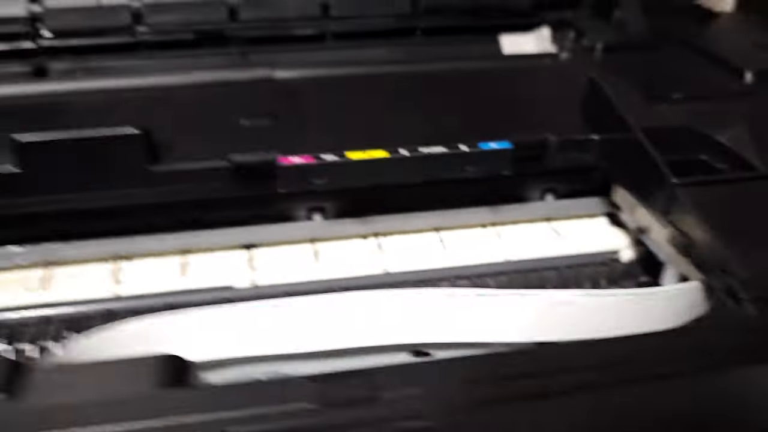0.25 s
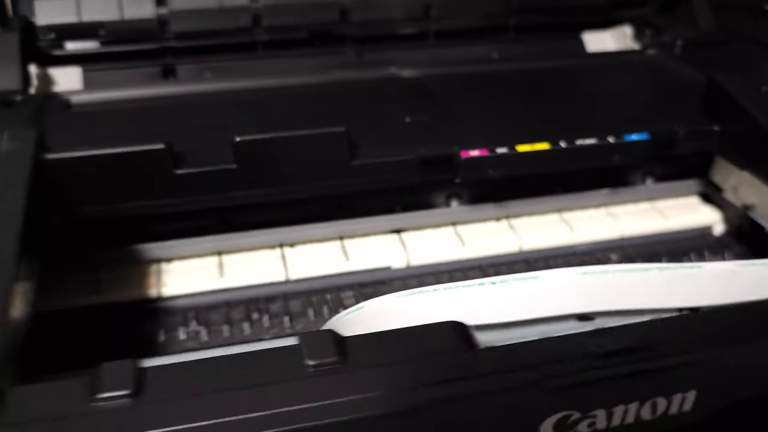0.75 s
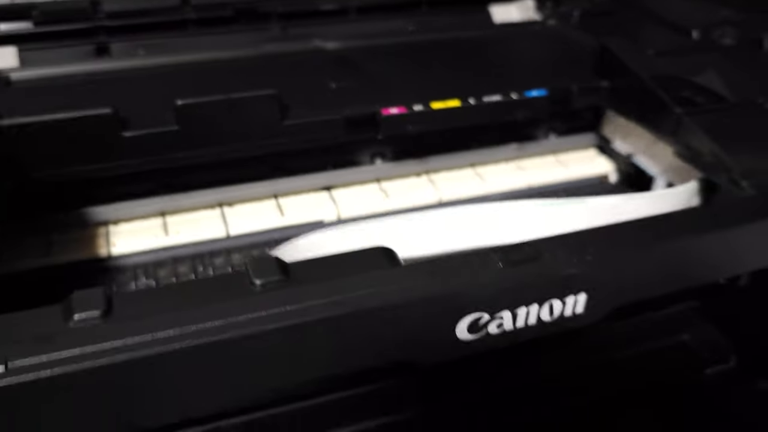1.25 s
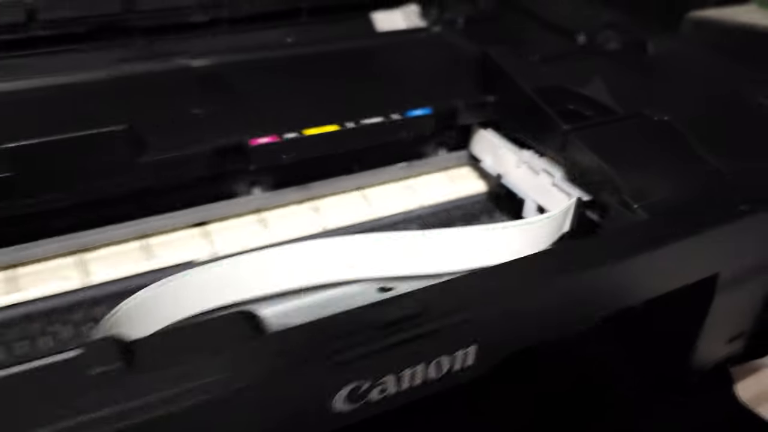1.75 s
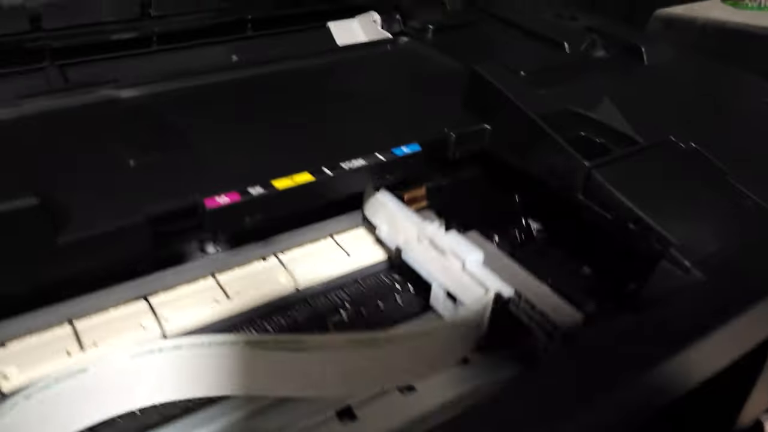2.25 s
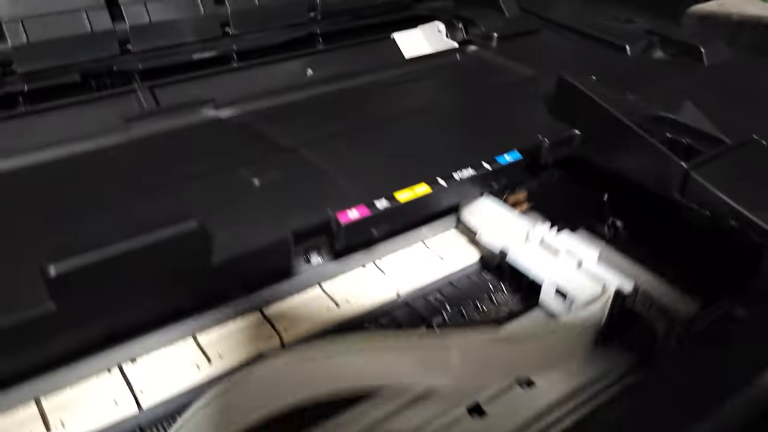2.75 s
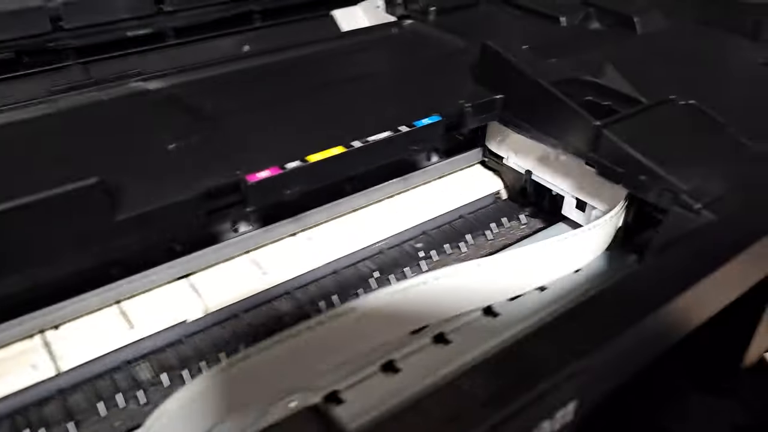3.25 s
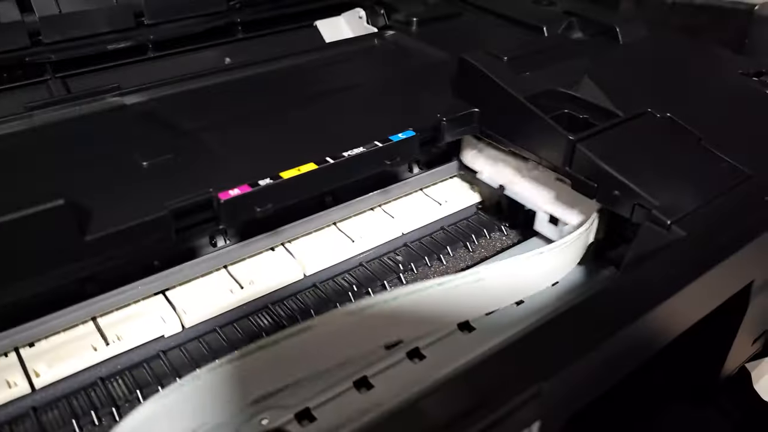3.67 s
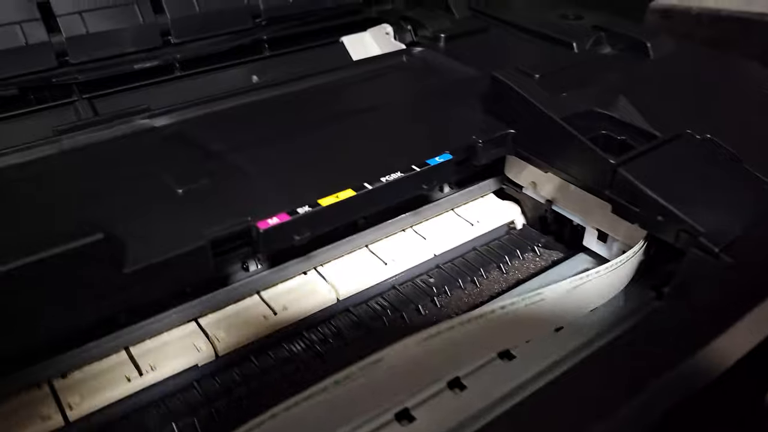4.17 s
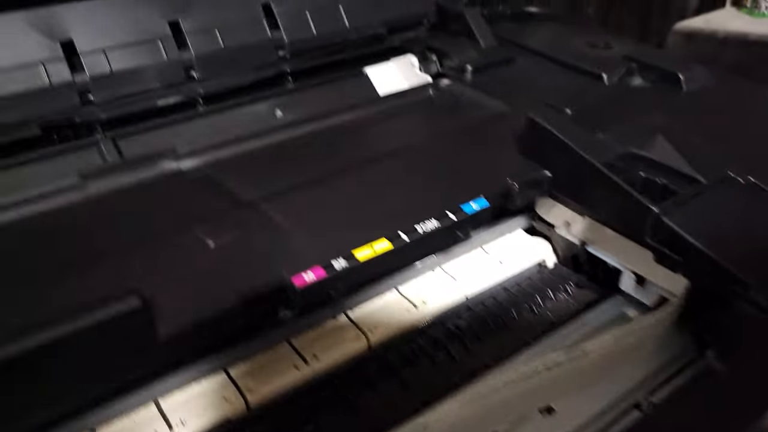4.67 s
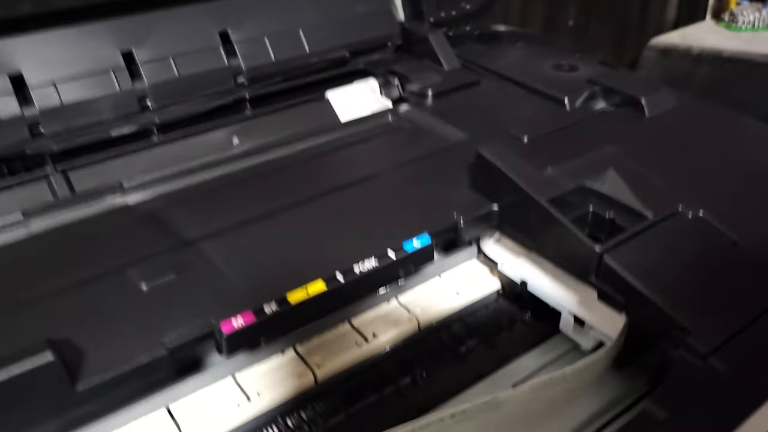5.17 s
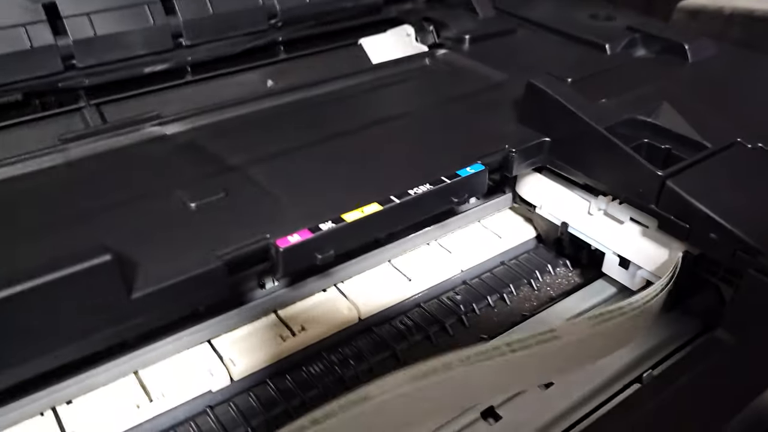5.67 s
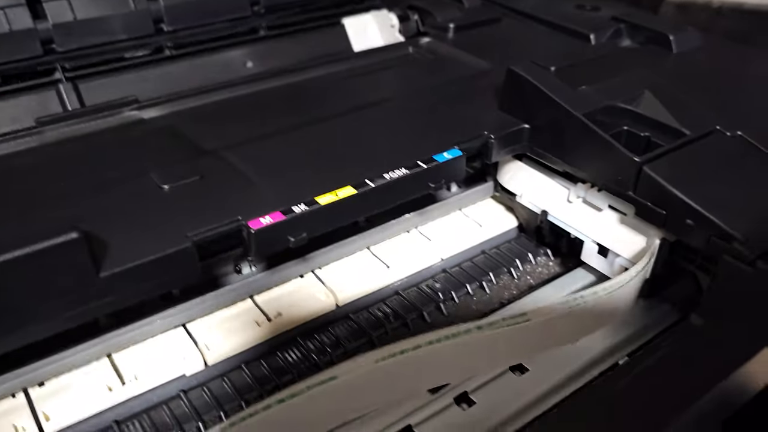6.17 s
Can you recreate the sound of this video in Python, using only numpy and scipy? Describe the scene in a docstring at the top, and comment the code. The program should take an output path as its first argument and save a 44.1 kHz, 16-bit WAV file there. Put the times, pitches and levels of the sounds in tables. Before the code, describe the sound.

An open inkjet printer hums and hisses as its carriage shuffles, with irregular plastic clicks and thumps, ending in a sharp knock.

```python
"""Inkjet printer shuffling its carriage.

Open printer, close by, small room. The motor hums through the plastic case; sliding parts hiss,
scrape and squeak; gears whine. Drive jolts thump the case and rattle loose parts, levers click.
At the end the carriage strikes its stop with a sharp knock that rings the frame."""
import sys
import numpy as np
from scipy import signal
from scipy.fft import rfft, irfft, next_fast_len
from scipy.io import wavfile
from scipy.ndimage import uniform_filter1d, map_coordinates

SR = 44100
rng = np.random.default_rng(int(sys.argv[2]) if len(sys.argv) > 2 else 0)


def store_pcm(level_fs):
    """Save levels as 16-bit WAV."""
    pcm = np.round(np.clip(level_fs, -1, 1) * 32767).astype(np.int16)
    wavfile.write(sys.argv[1], SR, np.atleast_2d(pcm).T)


N = 282284
HIT_N = SR // 2
TIME_S, HIT_S = np.arange(N) / SR, np.arange(HIT_N) / SR
SPIN_RAMP_S = 0.091

# motor runs: start/s, end/s, hum/dB, rub/dB
MOTOR_RUNS = [(-0.1, 0.533, -55, -62), (0.65, 1.46, -57.5, -69.5), (1.653, 3.415, -57.5, -71.5),
              (3.547, 4.224, -56, -100), (4.317, 5.117, -54, -76), (5.262, 6.5, -52, -59)]
# motor drone: f/Hz, density/dB
DRONE_SPECTRUM = [(20, -22), (50, -27), (72, -16.5), (105, 0), (180, -5), (300, -3), (390, -18), (550, -10),
                  (750, -63)]
# case resonances driven by the motor: f/Hz, width/Hz, level/dB
HUM_RESONANCES = [(56.5, 6.1, -5), (130, 8.2, 0), (196, 28, -4.5)]
# carriage passes: start/s, end/s, ramp/s, hiss/dB
CARRIAGE_PASSES = [(-0.1, 0.168, 0.025, -58), (0.223, 0.47, 0.057, -52), (1.843, 3.324, 0.28, -61.5),
                   (5.274, 5.46, 0.0044, -64)]
# rail resonances: f/Hz, width/Hz, level/dB
RAIL_RESONANCES = [(3380, 140, 13.5), (7400, 420, 12), (13100, 2600, 0.89)]
# parts catching: start/s, end/s, groan/dB, rasp/dB
CATCHES = [(0.45, 0.496, -47.5, -49), (0.674, 0.712, -49, -50.5), (3.329, 3.392, -43.5, -66),
           (3.551, 3.68, -54, -60), (4.019, 4.14, -54, -80), (4.321, 4.364, -49.5, -63)]
# sliding hiss, plastic rub: f/Hz, density/dB
SLIDE_SPECTRUM = [(700, -1.5), (1900, 0.5), (2500, -3), (3500, 0.5), (4500, 2), (6000, -3.5), (8600, -5.5),
                  (10300, -14.5), (12500, -7.5), (16000, -28)]
RUB_SPECTRUM = [(250, -13), (450, 11), (560, 9.5), (720, 9.5), (900, 4), (1400, 0.5), (2000, -1),
                (2600, -10), (4500, -12.5), (9000, -32)]
# drive jolts, lever clicks: t/s, strength/dB, hardness/0-1
DRIVE_JOLTS = [(0.138, -33, 0.52), (0.224, -29, 0.85), (0.858, -37.5, 0.47), (1.287, -33.5, 0.52),
               (1.781, -38, 0.74), (1.855, -38.5, 0.4), (2.537, -38, 0.48), (2.58, -46.5, 0.4),
               (3.254, -28.5, 0.28), (3.345, -27.5, 0.78), (3.551, -31.5, 0.57), (3.708, -30.5, 0.38),
               (3.804, -27, 0.78), (4.422, -39.5, 0.44), (4.877, -29, 0.53), (5.377, -41, 0.67),
               (6.149, -29, 0.77)]
LEVER_CLICKS = [(0.432, -38.5, 0.7), (0.566, -52, 0), (0.7151, -36.5, 0.88), (1.198, -46.5, 0.3),
                (1.272, -44.5, 0.63), (1.3643, -42.5, 0.99), (1.438, -52.5, 0.8), (1.49, -36.5, 0.78),
                (1.6379, -44, 0.26), (1.69, -30, 0.24), (1.9473, -42, 0.5), (3.254, -36.5, 0.2),
                (3.5939, -38, 0.82), (3.641, -28.5, 0.2), (3.708, -37, 0.32), (4.105, -25.5, 0.67),
                (4.33, -36.5, 0.16), (4.348, -37.5, 0.16), (4.37, -36.5, 1), (4.8595, -43.5, 0.74),
                (4.918, -32, 0.47), (5.023, -48.5, 0.28), (5.1162, -42, 0.49), (5.2301, -22, 0.12),
                (5.289, -33, 0.19), (5.51, -35.5, 0.31), (5.842, -39, 0.1), (6.2205, -36, 0.5)]
# blows on the stop, heavy shoves, latch ticks: t/s, level/dB
STOP_BLOWS = [(6.0706, -37), (6.087, -39.5), (6.1495, -26.5), (6.158, -40), (6.22, -33), (6.358, -27),
              (6.3628, -18.5), (6.3652, -13.5), (6.371, -23.5)]
SHOVES = [(1.81, -44.5), (6.08, -44), (6.15, -31), (6.383, -34)]
LATCH_TICKS = [(2.54, -47), (2.579, -49.5), (3.701, -47), (5.396, -46), (5.511, -49), (6.0708, -41.5),
               (6.166, -36.5)]
# bumps on the cover: t/s, level/dB, f/Hz
COVER_BUMPS = [(0.47, -43.5, 520), (2.561, -54, 406), (3.356, -34.5, 282), (3.671, -41.5, 316),
               (5.745, -36, 286), (5.842, -46.5, 527), (6.014, -40, 279), (6.076, -34.5, 315),
               (6.23, -40, 291)]
# cover modes: ratio to bump pitch, level/dB, t60/s
COVER_MODES = [(1, 7, 0.041), (2.149, -4.5, 0.057)]
# modes of the struck parts: f/Hz, level/dB, t60/s
CASE_MODES = [(125.8, -5.5, 0.19), (152.8, -2.5, 0.16), (189.2, 0, 0.13), (240, -2, 0.15),
              (298.8, -2.5, 0.1), (309.4, -4, 0.25), (342, -4.5, 0.15), (369, -10, 0.33)]
PANEL_MODES = [(454, -6.5, 0.11), (532, -5, 0.11), (615.5, -2, 0.075), (713, 0, 0.05), (1053, -5, 0.056),
               (1324, -5.5, 0.025), (1395, -1, 0.02)]
FRAME_MODES = [(546, 2.5, 0.062), (896, 3.5, 0.054), (1004, 5.5, 0.04), (1085, 8, 0.027),
               (1337, 6.5, 0.021), (1712, -4.5, 0.06), (1920, -6, 0.064), (2236, -2, 0.033),
               (2730, -10, 0.05), (3153, -5.5, 0.057)]
LEVER_MODES = [(1422, 7.5, 0.11), (1835, 8.5, 0.025), (2200, 4.5, 0.022), (2800, -3, 0.028),
               (3183, 4.5, 0.032), (3610, -3, 0.049), (4180, -1.5, 0.038)]
FEET_MODES = [(105, 0, 0.21)]
LATCH_RING_MODES = [(1995, 2, 0.023), (3720, -4, 0.032)]
# contact noises: f/Hz, density/dB
RATTLE_SPECTRUM = [(600, -10.5), (1300, -7.5), (2000, -0.5), (2500, -6.5), (3100, 0.5), (4000, -0.5),
                   (5000, 3.5), (6200, -4.5), (7300, -1.5), (8500, -9.5), (11000, -15.5), (16000, -19)]
CRACK_SPECTRUM = [(150, -14), (700, -5.5), (2100, 2), (3200, -5.5), (5200, -1), (6500, -9), (8000, -7),
                  (16000, -22)]
SNAP_SPECTRUM = [(500, -4), (1100, -4.5), (1450, -4.5), (2100, 1), (2700, -4.5), (4400, -5), (5200, -11.5),
                 (16000, -40)]
TICK_SPECTRUM = [(1500, -2.5), (4200, 10), (8000, -12.5), (15000, -22)]
LATCH_SPECTRUM = [(1200, -5), (2200, -1.5), (4500, 3), (7500, -0.5), (10000, -9.5), (16000, -16)]
# gear whines, plastic squeaks: start/s, end/s, f/Hz, glide/(oct/s), level/dB
GEAR_WHINES = [(3.24, 4.2, 308.7, 0, -54), (4.132, 4.178, 265, -3, -42), (4.42, 5.1, 302, 0, -59.5),
               (5.677, 5.77, 1066, 0.5, -58.5), (5.905, 5.97, 1075, 0.5, -62.5)]
PLASTIC_SQUEAKS = [(0.0, 0.057, 3860, 1, -56), (4.689, 4.8, 1860, -3, -68.5)]
# motor holding a load: start/s, end/s, level/dB
MOTOR_HOLDS = [(3.39, 3.552, -71), (3.85, 4.008, -71)]
# sizzle peaks, before squaring: f/Hz, width/Hz, level/dB
SIZZLE_RESONANCES = [(4680, 300, -3), (12500, 600, -5), (14100, 900, -7)]
# housing echoes: left delay/s, right delay/s, gain
HOUSING_ECHOES = [(0.0047, 0.009, 0.19)]
# decay of printer cavity and room: f/Hz, t60/s
CAVITY_DECAY = [(300, 0.12), (1500, 0.11), (4000, 0.04), (12000, 0.03)]
ROOM_DECAY = [(150, 0.23), (2000, 0.11), (14000, 0.14)]
# stereo image: f/Hz, left-right correlation
CORRELATION = [(100, 1), (280, 0.92), (600, 0.79), (1200, -0.026), (2200, -0.11), (5000, 0.014)]


def motor(rest_db=-84, shake_db=-4, shake_t60_s=0.26):
    """Rough drone plus case resonances; swells after each jolt."""
    running = sum(amp(db) * gate(start, end, SPIN_RAMP_S) for start, end, db, _ in MOTOR_RUNS)
    shaken = sum(hardness * amp(db + shake_db - 60 * np.abs(TIME_S - s) / shake_t60_s) * (TIME_S > s)
                 for s, db, hardness in DRIVE_JOLTS)
    level = np.sqrt(amp(rest_db) ** 2 + running ** 2 + shaken ** 2) * amp(2.94 * wobble(14))
    drone = noise(colour(DRONE_SPECTRUM), N)
    case = amp(-4.5) * noise(resonances(HUM_RESONANCES), N)
    return level * (drone + case)


def sliding_hiss(rest_db=-74, roller_db=-76):
    """Rollers hiss with the motor; the carriage adds a shifting hiss along its rail."""
    turning = sum(gate(start, end, SPIN_RAMP_S) for start, end, _, _ in MOTOR_RUNS)
    sliding = sum(amp(db) * gate(start, end, ramp) for start, end, ramp, db in CARRIAGE_PASSES)
    rollers = noise(lambda hz: colour(SLIDE_SPECTRUM)(hz) / np.hypot(1, hz / 9000), N)
    rail = patchy(noise(colour(SLIDE_SPECTRUM), N), depth_db=1.8)
    rail += amp(-10.5) * noise(resonances(RAIL_RESONANCES), N)
    return (amp(rest_db) + amp(roller_db) * turning) * rollers + sliding * rail


def scraping(slips_per_s=90):
    """Plastic rubs, and rasps where it catches; tiny slips ring the panels."""
    rubbing = sum(amp(db) * gate(start, end, SPIN_RAMP_S) for start, end, _, db in MOTOR_RUNS)
    groaning, rasping = sum(amp([[groan_db], [rasp_db]]) * gate(start, end, 0.012)
                            for start, end, groan_db, rasp_db in CATCHES)
    slips = (rng.random(N) < slips_per_s / SR) * rng.standard_normal(N)
    panel = ring(PANEL_MODES, attack_s=0.002, scatter_db=8)
    grain = unit(signal.fftconvolve(slips[None], panel, axes=1)[:, :N])
    rub = (rubbing + groaning) * (noise(colour(RUB_SPECTRUM), N) + amp(-19.5) * grain)
    rasp = rasping * noise(colour(SNAP_SPECTRUM), N)
    return (rub + rasp) * amp(2.06 * wobble(110))


def jolts(rebound_s=0.018, damping_db_per_s=65):
    """The drive takes up load: damped case thump, rattle, then a rebound as the slack closes again."""
    out = np.zeros((2, N))
    for s, db, hardness in DRIVE_JOLTS:
        panel_db = db + np.interp(hardness, [0, 1], [-15.5, -11.5])
        rattle_db = db + np.interp(hardness, [0, 1], [-44, 0.5])
        shiver = swell(noise(colour(RATTLE_SPECTRUM), HIT_N), rise_s=0.025)
        add(out, s - shiver.shape[1] / SR, amp(rattle_db - 19) * shiver)
        rebound = (rebound_s, hardness * amp(-5.5), hardness * amp(1.5))
        for delay_s, body_gain, loose_gain in [(0, 1, 1), rebound]:
            case = ring(CASE_MODES, attack_s=0.0051, scatter_db=0.5)
            thump = amp(db - 6 - damping_db_per_s * HIT_S) * case
            panel = chatter(ring(PANEL_MODES, attack_s=0.00015, scatter_db=6), decay_s=0.012)
            rattle = chatter(burst(RATTLE_SPECTRUM, CAVITY_DECAY), decay_s=0.013)
            loose = amp(panel_db) * panel + amp(rattle_db) * rattle
            add(out, s + delay_s, body_gain * thump + loose_gain * loose)
    return out


def stop_knock():
    """The carriage nudges its stop, strikes home, rebounds; the frame rings, hard blows crack more."""
    out = np.zeros((2, N))
    hardest_db = max(db for _, db in STOP_BLOWS)
    for s, db in STOP_BLOWS:
        frame = ring(FRAME_MODES, attack_s=0.00074, scatter_db=-1, detune=0.0086)
        crack = amp(-2 + 0.19 * (db - hardest_db)) * crest(burst(CRACK_SPECTRUM, CAVITY_DECAY))
        add(out, s, amp(db) * (frame + crack))
    return out


def lever_clicks(reference_db=-36.5, damping_db_per_s=108):
    """Plastic contacts: the harder, the brighter and faster the snap, and the less panel and case."""
    out = np.zeros((2, N))
    for s, db, hardness in LEVER_CLICKS:
        share = np.clip(hardness, 0.01, 0.99)
        edge, body = amp(db - reference_db) * np.array([share, 1 - share])
        tick_gain = amp(-57) * edge ** 3.57
        rise_s = 0.0035 / (1 + tick_gain * amp(52))
        snap = edge * amp(-41) * crest(burst(SNAP_SPECTRUM, CAVITY_DECAY) * onset(rise_s))
        lever = ring(LEVER_MODES, attack_s=rise_s / 2, scatter_db=2, detune=0.011)
        lever = edge * amp(-45.5) * chatter(lever, decay_s=0.004, count=4)
        tick = tick_gain * crest(burst(TICK_SPECTRUM, CAVITY_DECAY))
        panel = body * amp(-39.5) * ring(PANEL_MODES, attack_s=0.00091, scatter_db=2.5)
        panel *= amp(-damping_db_per_s * HIT_S)  # lever stays on the panel
        thump = body ** 0.57 * amp(-48) * ring(CASE_MODES, attack_s=0.0045, scatter_db=5.5)
        add(out, s, snap + lever + tick + panel + thump)
    return out


def cover_bumps():
    """The hollow cover answers soft bumps with a short note."""
    out = np.zeros((2, N))
    for s, db, hz in COVER_BUMPS:
        modes = [(hz * ratio, mode_db, t60_s) for ratio, mode_db, t60_s in COVER_MODES]
        add(out, s, amp(db) * ring(modes, attack_s=0.003, scatter_db=2))
    return out


def rocking():
    """Heavy shoves set the printer booming on its feet."""
    out = np.zeros((2, N))
    for s, db in SHOVES:
        add(out, s, amp(db) * ring(FEET_MODES, attack_s=0.007, scatter_db=0))
    return out


def latch():
    """A small, stiff catch drops in with a crisp tick."""
    out = np.zeros((2, N))
    for s, db in LATCH_TICKS:
        tick = noise_tick(LATCH_SPECTRUM, t60_s=0.04)
        ping = amp(-3) * ring(LATCH_RING_MODES, attack_s=0.0017, scatter_db=11)
        add(out, s, amp(db) * (tick + ping))
    return out


def settling(window_s=0.05):
    """Loose parts settle with two faint taps after each click."""
    out = np.zeros((2, N))
    taps = [(s + window_s * (k + rng.random()) / 2, amp(db - 16.5) * (hardness + 1e-3))
            for s, db, hardness in LEVER_CLICKS for k in range(2)]
    for s, gain in taps:
        add(out, s, gain * noise_tick(SNAP_SPECTRUM, t60_s=0.031))
    return out


def gears(waver=0.012, flutter_db=3.5):
    """Meshing gears sing in thin, fluttering tones."""
    speed = 1 + waver * wobble(25)
    tones = sum(amp(db) * gate(start, end, 0.005) * glide(hz * speed, oct_per_s, start, end)
                for start, end, hz, oct_per_s, db in GEAR_WHINES)
    return tones * amp(flutter_db * wobble(70))


def squeaks(relative_half_width=0.12, flicker_db=3.5):
    """Dry plastic sticks and slips: a narrow, broken, gliding noise band."""
    out = np.zeros((2, N))
    for start, end, hz, oct_per_s, db in PLASTIC_SQUEAKS:
        cutoff_hz = relative_half_width * hz
        grit = filtered(rng.standard_normal((2, N)), lambda f: 1 / (1 + (f / cutoff_hz) ** 4))
        out += amp(db) * gate(start, end, 0.0051) * unit(grit * glide(hz, oct_per_s, start, end))
    return out * unit(amp(flicker_db * wobble(130)))


def motor_sizzle():
    """Thin, very high sizzle of the motor holding a load."""
    held = sum(amp(db) * gate(start, end, 0.0055) for start, end, db in MOTOR_HOLDS)
    return held * noise(lambda hz: sum(np.abs(resonances([p])(hz)) ** 2 for p in SIZZLE_RESONANCES), N)


def housing(x, corner_hz=900):
    """Close plastic walls reflect the treble: a boxy colour."""
    echoes = lambda hz: sum(gain * np.exp(-2j * np.pi * hz * np.array([[left_s], [right_s]]))
                            for left_s, right_s, gain in HOUSING_ECHOES)
    return filtered(x, lambda hz: 1 + echoes(hz) * hz ** 2 / (hz ** 2 + corner_hz ** 2))


def room(x):
    """Short reverberation off the walls."""
    tail = burst([(1000, 0)], ROOM_DECAY) * onset(0.059)
    return signal.fftconvolve(x, tail / np.linalg.norm(tail[0]), axes=1)[:, :N]


def ring(modes, attack_s, scatter_db, detune=0.026):
    """Damped modes, scattered in level and pitch; high ones out of phase between sides."""
    hz, db, t60_s = np.transpose(modes)[:, :, None]
    envelope = amp(db + scatter_db * rng.standard_normal(hz.shape) - 60 * HIT_S / t60_s)
    detuned_hz = hz * (1 + detune * rng.standard_normal(hz.shape))
    phase = 2 * np.pi * (detuned_hz * HIT_S + rng.random(hz.shape))
    pair = np.array([(envelope * np.sin(phase + side * spread_rad(hz))).sum(0) for side in (1, -1)])
    return crest(pair * onset(attack_s))


def burst(spectrum, decay):
    """Dense modes struck at once; t60 varies with frequency."""
    hz, t, bins = signal.stft(noise(colour(spectrum), HIT_N), SR, nperseg=128)
    bins *= amp(-60 * t / along(decay, hz)[:, None])
    return signal.istft(bins, SR, nperseg=128)[1][:, :HIT_N]


def noise_tick(spectrum, t60_s):
    """Noise hit with one decay time."""
    return crest(noise(colour(spectrum), HIT_N) * amp(-60 * HIT_S / t60_s))


def chatter(x, decay_s, count=14):
    """Loose parts touch again and again, fading after first contact."""
    lag = (np.arange(count) + rng.random(count)) / count * 2
    contacts = np.zeros(HIT_N)
    np.add.at(contacts, (lag * decay_s * SR).astype(int), 0.97 * rng.standard_normal(count) * np.exp(-lag))
    contacts[0] = 1
    return crest(signal.fftconvolve(x, contacts[None], axes=1)[:, :HIT_N])


def noise(response, size):
    """Coloured stereo noise: bass shared, treble unrelated."""
    split = lambda hz: np.array([np.cos(spread_rad(hz)), np.sin(spread_rad(hz))])
    mid, side = filtered(rng.standard_normal((2, size)), lambda hz: response(hz) * split(hz))
    return unit(np.array([mid + side, mid - side]))


def patchy(x, depth_db):
    """Narrow bands swell and fade independently."""
    bins = signal.stft(x)[2]
    field = uniform_filter1d(rng.standard_normal(bins.shape[1:]), size=3, axis=0)
    field = uniform_filter1d(field, size=50, axis=1)
    return signal.istft(bins * amp(depth_db * unit(field)))[1][:, :N]


def glide(hz, oct_per_s, start_s, end_s):
    """Sine gliding from start to end."""
    pitch_hz = hz * 2 ** (oct_per_s * np.clip(TIME_S - start_s, 0, end_s - start_s))
    return np.sin(2 * np.pi * np.cumsum(pitch_hz) / SR)


def swell(x, rise_s):
    """Reversed decay, 0.1 s long."""
    return (x * np.exp(-HIT_S / rise_s))[:, :SR // 10][:, ::-1]


def onset(rise_s):
    """Exponential attack."""
    return 1 - np.exp(-HIT_S / rise_s)


def gate(start_s, end_s, ramp_s):
    """Soft-edged gate."""
    return (np.tanh((TIME_S - start_s) / ramp_s) - np.tanh((TIME_S - end_s) / ramp_s)) / 2


def wobble(rate_hz):
    """Smooth random curve."""
    knots = rng.standard_normal(int(N * rate_hz / SR) + 4)
    return map_coordinates(knots, [TIME_S * rate_hz])


def filtered(x, response):
    """Apply a frequency response."""
    n = x.shape[-1]
    padded = next_fast_len(n + 8192)
    return irfft(rfft(x, padded) * response(np.fft.rfftfreq(padded, 1 / SR)), padded)[..., :n]


def resonances(peaks):
    """Response of parallel band-passes."""
    return lambda f: sum(amp(db) * f * width / (hz * hz - f * f + 1j * f * width)
                         for hz, width, db in peaks)


def colour(spectrum):
    """Response through (f/Hz, level/dB) points."""
    return lambda hz: amp(along(spectrum, hz))


def spread_rad(hz):
    """Mid-side angle for the stereo correlation."""
    return np.arccos(np.clip(along(CORRELATION, hz), -1, 1)) / 2


def along(points, hz):
    """Interpolate over log frequency."""
    f, values = np.transpose(points)
    return np.interp(np.log(hz + 1), np.log(f + 1), values)


def amp(db):
    """dB to gain."""
    return 10 ** (np.asarray(db) / 20)


def unit(x):
    """Scale to rms 1."""
    return x / np.sqrt(np.mean(x ** 2) + 1e-20)


def crest(x):
    """Scale the loudest 6 ms to rms 1."""
    return x / np.sqrt(uniform_filter1d(np.mean(x ** 2, 0), size=256).max())


def add(track, s, sound):
    """Mix in at time s."""
    part = track[:, round(s * SR):][:, :sound.shape[1]]
    part += sound[:, :part.shape[1]]


def scene(left_bias_db=1.07):
    """Hits and their reverberation over the running mechanism, slightly left."""
    hits = jolts() + lever_clicks() + cover_bumps() + latch() + settling() + stop_knock()
    inside = housing(hits + sliding_hiss() + scraping() + squeaks())
    mix = inside + amp(-9.5) * room(hits) + rocking() + motor() + gears() + motor_sizzle()
    return mix * amp(left_bias_db * np.array([[1], [-1]]) / 2)


def record(dry):
    """First-order low cut, steep top cut."""
    low_hz, top_hz = 30, 16050
    low_cut = lambda hz: 1j * hz / (1j * hz + low_hz)
    return filtered(dry, lambda hz: low_cut(hz) * np.clip((top_hz - hz) / 200 + .5, 0, 1))


dry = scene()
out = record(dry)
store_pcm(out)
```